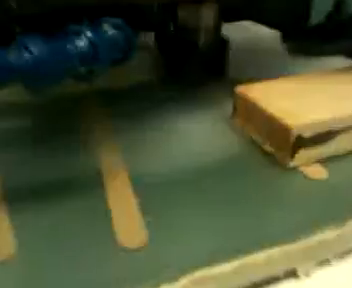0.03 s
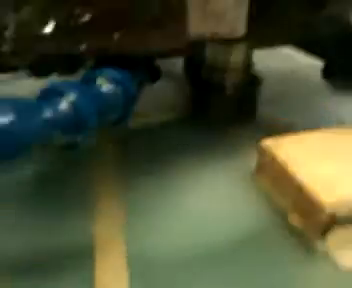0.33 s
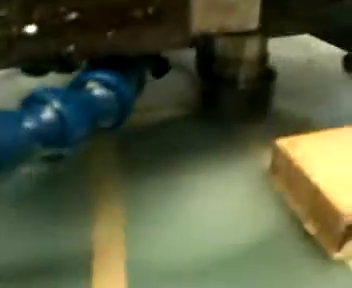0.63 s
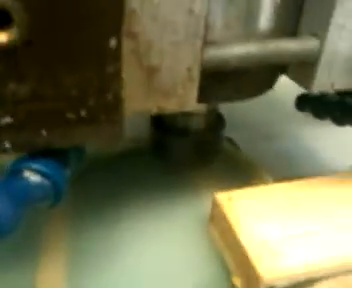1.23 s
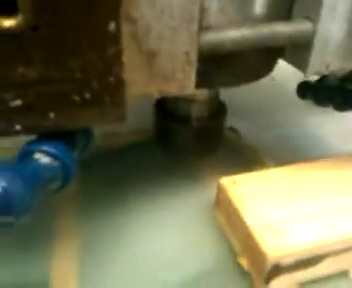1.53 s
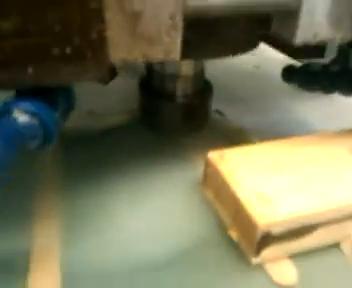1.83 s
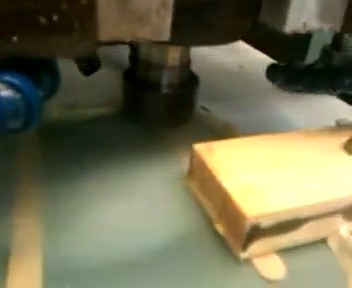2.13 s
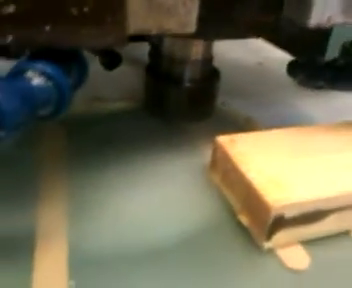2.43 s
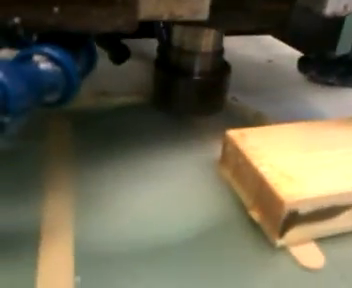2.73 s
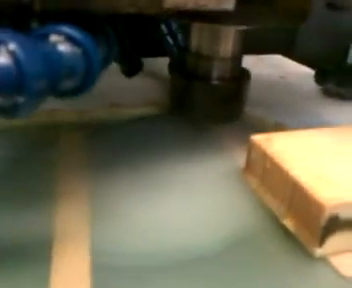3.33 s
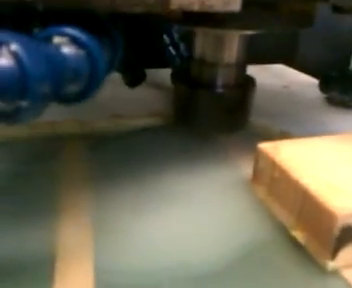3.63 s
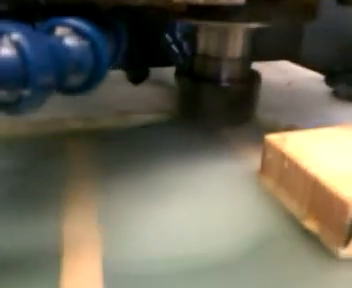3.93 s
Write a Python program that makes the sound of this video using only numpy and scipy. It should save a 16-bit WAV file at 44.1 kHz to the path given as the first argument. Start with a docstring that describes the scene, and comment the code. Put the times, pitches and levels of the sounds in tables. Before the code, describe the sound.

Close to the microphone in a workshop, a fast milling spindle whines and hums while its cutter rasps and hisses on glass. A high squeal sinks midway and builds again, while shrill whistles rise and fall in loudness at constant pitch.

```python
"""A milling spindle grinds into glass at a steady 10800 turns a minute, close by in a workshop.
After a quick fade-in everything sounds at once: the shaft hums, the drive and bearings whistle, and the
cutter squeals, hisses and makes a rasp that nearly repeats with every turn. The whistles then swell and
fade as the microphone moves. The squeal sinks halfway through and builds up again, and in the last
second one tone of the hum surges twice."""
import sys
import numpy as np
from scipy.fft import rfft, irfft, next_fast_len
from scipy.io import wavfile
from scipy.ndimage import map_coordinates

SR = 44100
rng = np.random.default_rng(int(sys.argv[2]) if len(sys.argv) > 2 else 0)


def persist_wave(psi):
    """Save psi, clipped to +-1, as 16-bit WAV."""
    counts = np.round(np.clip(psi, -1, 1) * 32767).astype(np.int16)
    wavfile.write(sys.argv[1], SR, np.atleast_2d(counts).T)


N = 176400  # 4 seconds

SHAFT_HZ = 179.4  # turns a second
TOP_HZ = 7270  # upper edge of the grinding sound
PITCH_WANDER = 0.00033  # drift of the squeal and the weaker tones, as a fraction of their pitch


def amp(db):
    """Turn decibels (dB) into a number to multiply a sound by."""
    return 10 ** (np.asarray(db) / 20)


def value_at_pitch(points, hz):
    """Read between rows of (Hz, value), giving each octave about the same room."""
    pitches, values = np.transpose(points)
    return np.interp(np.log(hz + 1), np.log(pitches + 1), values)


def curve(points):
    """Join rows of (seconds, value) with straight lines, giving one value per sample."""
    seconds, values = np.transpose(points)
    return np.interp(np.arange(N) / SR, seconds, values)


def wobble(rate):
    """A smooth curve through `rate` random values a second."""
    samples = np.linspace(0, N, 2048)
    values = rng.standard_normal(1024)
    smooth = map_coordinates(values, [samples * rate / SR], mode="wrap")
    return np.interp(np.arange(N), samples, smooth)


def filtered(sound, gain):
    """Make each frequency of a sound louder or softer by the factor gain(hz)."""
    size = next_fast_len(N + SR // 2)
    hz = np.fft.rfftfreq(size, 1 / SR)
    return irfft(rfft(sound, size) * gain(hz), size)[..., :N]


def rotor_time(wander, rate):
    """Time in seconds as kept by a spinning part whose speed is slightly unsteady."""
    return np.cumsum(1 + wander * wobble(rate)) / SR


def tone(hz, db, time, scatter=1):
    """A pure tone with average (rms) level db; its start slips by up to `scatter` of a cycle."""
    return np.sqrt(2) * amp(db) * np.cos(2 * np.pi * (hz * time + scatter * rng.random()))


def band_swells():
    """How far four pitch bands, from middle to treble, rise and fall around their average, in dB."""
    # Loudness of each band (the screech is near 4500 Hz). Each row: time in seconds, level in dB.
    middle = [(0.15, -40), (0.23, -38), (0.31, -39), (0.74, -37.5), (2.57, -39), (3.8, -37.5),
              (3.95, -37.5)]
    upper_middle = [(0.15, -33), (1.12, -33), (1.38, -30), (1.56, -36), (1.57, -32.5), (2.32, -33.5),
                    (2.33, -35.5), (3.09, -32), (3.26, -32), (3.95, -30.5)]
    screech = [(0.15, -30.5), (0.76, -32), (0.79, -28), (1.19, -33.5), (1.41, -28.5), (1.44, -33.5),
               (1.56, -29.5), (1.91, -34), (1.94, -32), (2.65, -30.5), (3.32, -29), (3.47, -34),
               (3.66, -28.5), (3.67, -38), (3.9, -32), (3.95, -34)]
    treble = [(0.15, -24), (0.36, -24.5), (0.39, -19.5), (0.65, -22), (0.92, -19.5), (0.93, -24),
              (0.99, -21), (1.14, -21.5), (1.29, -24), (1.6, -21), (1.9, -21), (1.92, -19.5), (2.32, -20),
              (2.4, -22.5), (2.5, -21), (3.04, -22.5), (3.95, -24.5)]
    levels = [curve(band) for band in (middle, upper_middle, screech, treble)]
    return np.array([level - level.mean() for level in levels])


def band_shares(hz):
    """How much a frequency belongs to each of the four bands, from 0 to 1."""
    borders_hz = [(1900, 2600), (3700, 4300), (4800, 6100)]
    above = [np.interp(hz, border, [0, 1]) for border in borders_hz]
    return np.array([1 - above[0], above[0] - above[1], above[1] - above[2], above[2]])


def shaft_hum():
    """One push per turn makes a row of tones; the higher ones shake more under the cutting load."""
    # Tones of the hum. Each row: order (vibrations per turn), relative level in dB.
    orders = [(1, -33), (2, -35), (3, -41.5), (4, -43), (5, -47), (6, -49), (7, -54.5), (8, -58), (9, -52),
              (10, -54.5), (11, -54.5), (12, -47), (13, -46.5), (14, -56.5), (15, -53.5), (16, -46.5),
              (17, -57), (18, -44), (19, -56.5), (20, -61.5)]
    # Orders 2 and 4 swell during the cut instead. Each row: time in seconds, relative level in dB.
    second = [(0.15, -41), (0.4, -38.5), (1.1, -39.5), (1.6, -41.5), (3.0, -41), (3.3, -41), (3.95, -38)]
    fourth = [(0.15, -49), (0.55, -45), (1.46, -45.5), (1.65, -52.5), (1.79, -40.5), (2.92, -45),
              (3.13, -33.5), (3.23, -45), (3.88, -33), (3.95, -38)]
    swelling = {2: curve(second), 4: curve(fourth)}
    time = rotor_time(wander=0.00055, rate=14)
    hum = np.zeros(N)
    for order, db in orders:
        level = swelling.get(order, db)
        shake_db = (-1.22 + 0.3938 * min(order - 1, 10)) * wobble(rate=14)
        scatter = min(order / 6, 1) ** 2  # only orders below 6 keep in step with the shaft
        hum += tone(order * SHAFT_HZ, level + shake_db, time, scatter)
    return amp(-1.5) * hum


def drive_whistles():
    """The motor drive sings loud, clean tones that hold their pitch while they swell and fade."""
    # Loudness of each whistle. Each row: time in seconds, relative level in dB.
    low = [(0.15, -45), (0.45, -33.5), (0.69, -51), (0.77, -41.5), (1.18, -45.5), (1.56, -39),
           (1.77, -51.5), (2.04, -35.5), (2.31, -50), (2.57, -37), (2.8, -50), (3.95, -42.5)]
    main = [(0.15, -42), (0.53, -32), (0.74, -43.5), (1.05, -29), (1.2, -34.5), (1.47, -29.5), (1.75, -32),
            (1.97, -28.5), (2.31, -33.5), (2.44, -29), (2.62, -29.5), (2.82, -35.5), (3.13, -28.5),
            (3.4, -36.5), (3.71, -31.5), (3.95, -38)]
    bright = [(0.15, -35), (0.24, -35.5), (0.42, -29.5), (0.82, -34), (1.35, -29.5), (1.48, -34),
              (1.94, -29.5), (2.39, -31), (2.86, -29.5), (3.12, -31), (3.43, -39), (3.95, -33.5)]
    upper = [(0.15, -30.5), (0.25, -36), (0.47, -38.5), (0.66, -31), (1.05, -31.5), (1.23, -42.5),
             (1.66, -46), (1.78, -50.5), (3.2, -31.5), (3.95, -37.5)]
    high = [(0.15, -34), (0.35, -36), (0.61, -32.5), (0.72, -36.5), (1.07, -37), (1.24, -37.5),
            (1.77, -39.5), (1.96, -29.5), (3.05, -32), (3.47, -40), (3.92, -43.5), (3.95, -50)]
    ringing = [(0.15, -39), (0.3, -42), (0.77, -33.5), (1.12, -52), (1.23, -30.5), (1.31, -37.5),
               (1.92, -31), (1.99, -38), (2.09, -35), (2.86, -44.5), (3.54, -37.5), (3.95, -41)]
    piercing = [(0.15, -35), (0.25, -37.5), (1.14, -44), (1.23, -43.5), (2.85, -38), (2.93, -40),
                (3.41, -28.5), (3.95, -34)]
    shrill = [(0.15, -35), (0.86, -38), (1.12, -29), (1.2, -36.5), (1.92, -39), (2.06, -33), (2.84, -29.5),
              (2.93, -37), (3.49, -40.5), (3.95, -46)]
    thin = [(0.15, -41), (0.24, -48), (0.4, -32), (0.61, -34.5), (0.68, -29.5), (1.32, -47), (2.02, -31),
            (2.63, -33), (2.76, -39), (3.95, -30.5)]
    levels_by_hz = {2223: low, 2377.5: main, 3818.2: bright, 4178.3: upper, 4898: high,
                    5672.5: ringing, 5977.3: piercing, 6101: shrill, 6974: thin}
    time = rotor_time(wander=0.00015, rate=8)
    whistles = np.zeros(N)
    for hz, levels in levels_by_hz.items():
        shake_db = 0.42 * wobble(rate=25)
        whistles += tone(hz, curve(levels) + shake_db, time)
    return amp(2.5) * whistles


def bearing_whistles():
    """Bearings and drive add weaker tones; each swells with its band and also fades at random."""
    # The weaker whistles. Each row: pitch in Hz, relative level in dB.
    tones = [(1150, -53), (1227, -46), (1311, -47), (1544, -46.5), (1723, -45.5), (2019, -45), (2298, -46),
             (2908, -45.5), (3099, -42), (3375, -44.5), (3418, -54), (3459, -40), (3499, -46.5),
             (3526, -46.5), (3639, -49.5), (3778, -48.5), (4358, -47), (4675, -38.5), (4938, -45.5),
             (5257, -38.5), (5437, -48.5), (5593, -47.5), (5825, -39), (5995, -41), (6018, -44),
             (6197, -45.5), (6297, -38.5), (6329, -39.5), (6354, -34.5), (6418, -39), (6517, -38),
             (6558, -45), (6737, -35.5), (6822, -35), (7097, -41)]
    swells = band_swells()
    whistles = np.zeros(N)
    for hz, db in tones:
        fade_db = 3 * wobble(rate=2.924)
        shake_db = 1.12 * wobble(rate=30)
        level = db + band_shares(hz) @ swells + fade_db + shake_db
        whistles += tone(hz, level, rotor_time(PITCH_WANDER, rate=10))
    return amp(-2) * whistles


def metal_shimmer(count=130, lowest_hz=3393, spread_db=14):
    """Many faint tones of the bearings and frame, at random pitches, make the hiss sound metallic."""
    # Strength of the faint tones. Each row: pitch in Hz, typical level of one tone in dB.
    typical_levels = [(3400, -57), (4500, -53), (5400, -57), (6200, -48.5), (6900, -52.5), (7270, -57.5)]
    swells = band_swells()
    shimmer = np.zeros(N)
    for family in np.array_split(rng.random((count, 2)), 10):  # a family drifts and fades together
        time = rotor_time(PITCH_WANDER, rate=10)
        fade_db = wobble(rate=4)
        for height, strength in family:
            hz = lowest_hz + (TOP_HZ - lowest_hz) * height
            db = value_at_pitch(typical_levels, hz) + spread_db * (strength - 0.5)
            shimmer += tone(hz, db + fade_db + band_shares(hz) @ swells, time)
    return shimmer


def cutter_squeal():
    """The cutter squeals on the glass in a few close, fluttering tones."""
    # Loudness of the squeal. Each row: time in seconds, level in dB.
    levels = [(0.15, -31), (0.18, -37), (0.21, -31), (0.75, -35), (0.79, -31), (1.19, -36.5), (1.41, -28.5),
              (1.44, -32), (1.59, -34), (1.86, -40), (3.66, -28), (3.68, -29.5), (3.84, -27), (3.95, -31.5)]
    # Its tones. Each row: pitch in Hz, dB added to that level.
    tones = [(4452, -5), (4522, -3.5), (4538, -7.5), (4600, -13.5)]
    squeal = np.zeros(N)
    for hz, db in tones:
        flutter_db = 2.5 * wobble(rate=31)
        squeal += tone(hz, curve(levels) + db + flutter_db, rotor_time(PITCH_WANDER, rate=13))
    return squeal


def cutter_grinding(likeness=0.76, dip_depth=0.82):
    """Grit scrapes the glass: an even hiss, and a rasp in which each turn resembles the last."""
    # Tone colour of the hiss and of the rasp. Each row: frequency in Hz, relative level in dB.
    hiss_colour = [(25, -19.5), (100, -16.5), (132, -33), (180, -16.5), (300, -24), (450, -17.5),
                   (700, -16), (950, -16), (1300, -13.5), (1900, -32.5), (2250, -5.5), (2600, -13.5),
                   (3000, -14.5), (3400, -13), (3800, -14.5), (4500, -10.5), (5400, -11.5), (6200, -0.5),
                   (7200, -9.5)]
    rasp_colour = [(90, -48), (170, -8), (360, -13.5), (700, -7.5), (1100, -11.5), (1700, -6), (2250, -3.5),
                   (2700, -5), (3500, -3.5), (4500, -4.5), (6000, 4.5), (7200, 4.5)]
    # Narrow dips where the noise is weaker. Each row: centre in Hz, width in Hz.
    dips = [(322, 8.1), (765, 14), (940, 23), (1107, 11), (1178, 33), (1690, 10), (1928, 23), (2102, 8.7),
            (2420, 9.1), (2600, 16), (2762, 8), (2985, 23), (3335, 32), (3690, 54), (3875, 20), (5635, 12)]

    def noise(gain):
        """Random noise below TOP_HZ, shaped by gain(hz) and brought to an average (rms) size of 1."""
        shaped = filtered(rng.standard_normal(N), lambda hz: gain(hz) * (hz < TOP_HZ))
        return shaped / np.sqrt(np.mean(shaped ** 2) + 1e-20)

    def repeat_each_turn(hz):
        """Works like an echo one turn later, `likeness` times as strong each time round."""
        return 1 / (1 - likeness * np.exp(-2j * np.pi * hz / SHAFT_HZ))

    def dip_gain(hz):
        """How much of each frequency is left after all the dips."""
        gains = [1 - dip_depth * np.exp(-((hz - centre) / width) ** 2) for centre, width in dips]
        return np.prod(gains, axis=0)

    hiss = amp(-33) * noise(lambda hz: amp(value_at_pitch(hiss_colour, hz)))
    rasp = amp(-28) * noise(lambda hz: amp(value_at_pitch(rasp_colour, hz)) * repeat_each_turn(hz))
    bands = filtered(hiss + rasp, lambda hz: dip_gain(hz) * band_shares(hz))
    return np.sum(bands * amp(band_swells()), axis=0)


def scene():
    """The spindle and its cutter sound together, in one channel."""
    spindle = shaft_hum() + drive_whistles() + bearing_whistles() + metal_shimmer()
    return (spindle + cutter_squeal() + cutter_grinding())[None]


def record(dry):
    """The sound fades in; above TOP_HZ one hears only a faint mirror image of the treble."""
    # Strength of the mirror image. Each row: frequency in Hz, gain in dB.
    mirror_gains = [(8000, -68), (8750, -30.5), (9000, -35), (9200, -50), (9450, -76), (9800, -120)]
    start_s, fade_s, mirror_hz = 0.071, 0.051, 16000
    t = np.arange(N) / SR
    faded = dry[0] * np.clip((t - start_s) / fade_s, 0, 1)
    trimmed = filtered(faded, lambda hz: 1 / np.sqrt(1 + np.minimum(hz / TOP_HZ, 2) ** 400))
    flipped = 2 * trimmed * np.cos(2 * np.pi * mirror_hz * t)  # a pitch f lands at mirror_hz - f
    mirror = filtered(flipped, lambda hz: amp(value_at_pitch(mirror_gains, hz)))
    return filtered(trimmed + mirror, lambda hz: hz < 9400)[None]


dry = scene()
out = record(dry)
persist_wave(out)
```